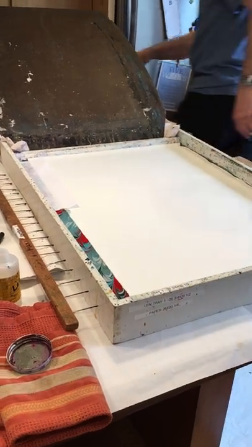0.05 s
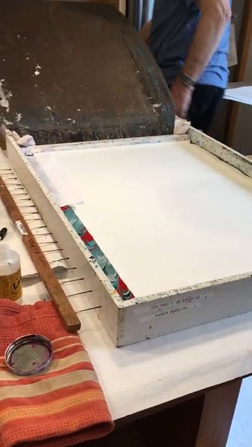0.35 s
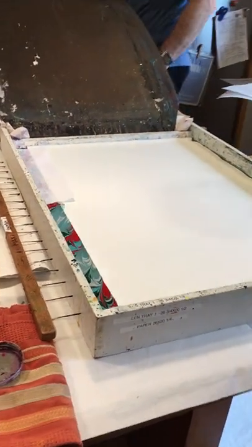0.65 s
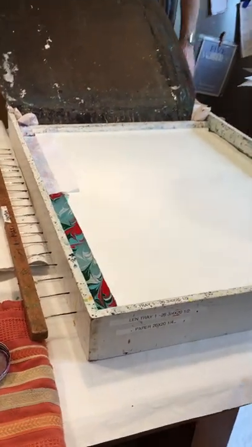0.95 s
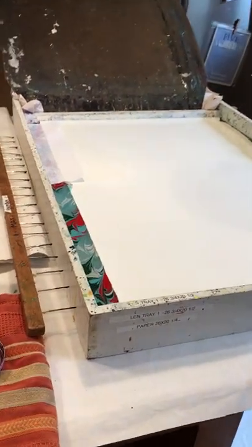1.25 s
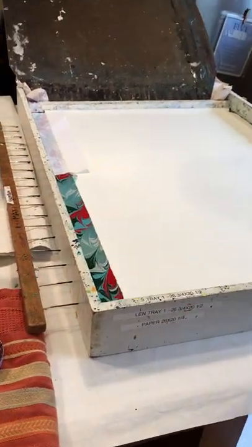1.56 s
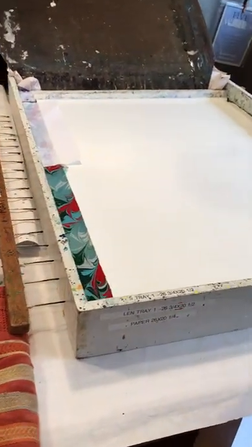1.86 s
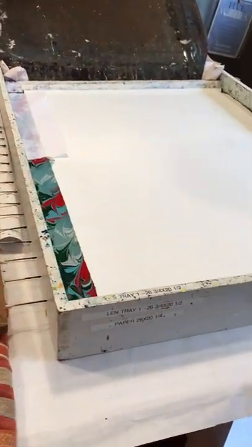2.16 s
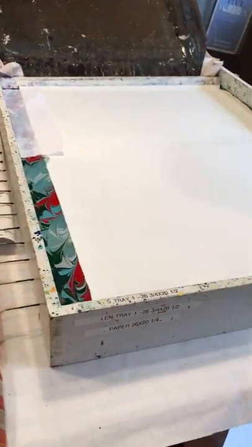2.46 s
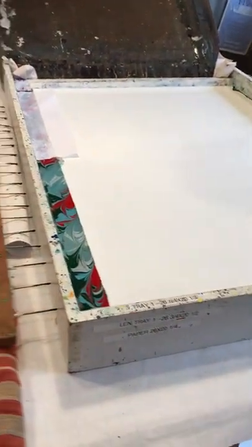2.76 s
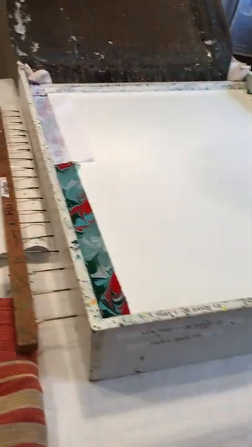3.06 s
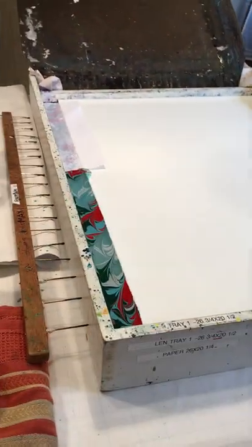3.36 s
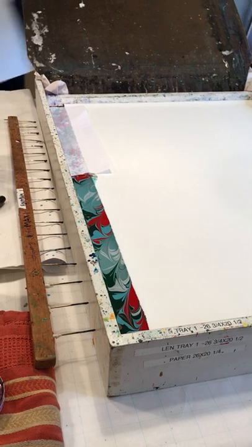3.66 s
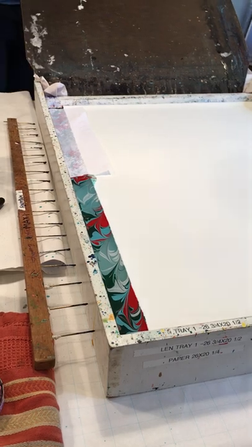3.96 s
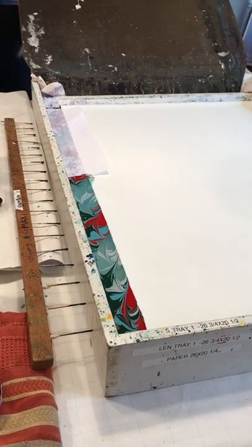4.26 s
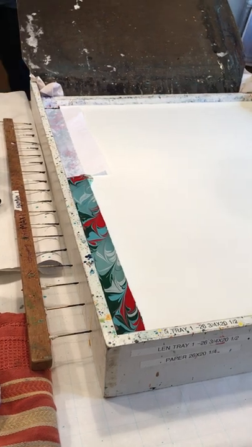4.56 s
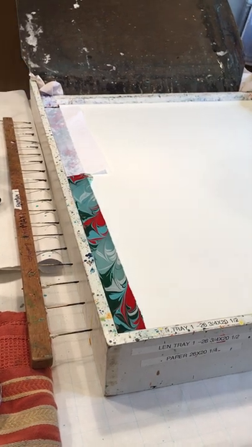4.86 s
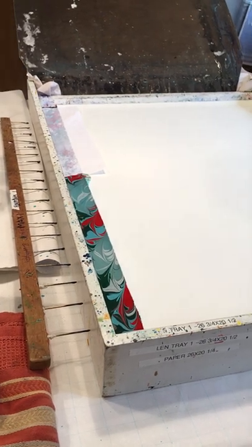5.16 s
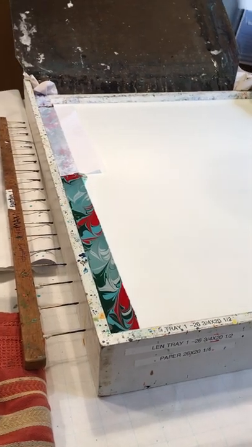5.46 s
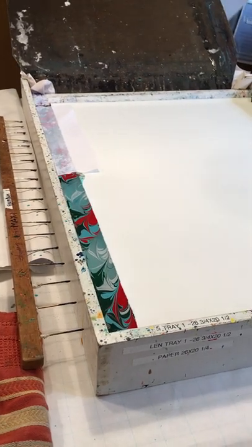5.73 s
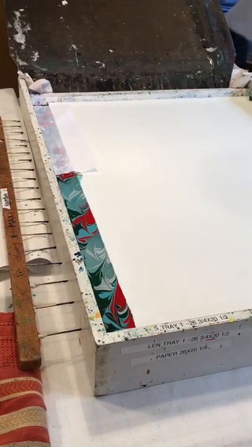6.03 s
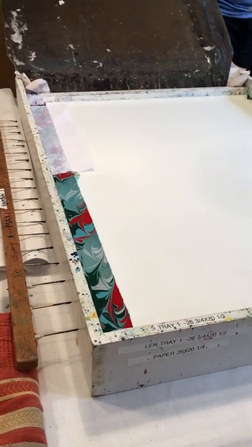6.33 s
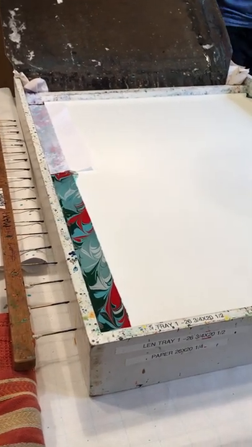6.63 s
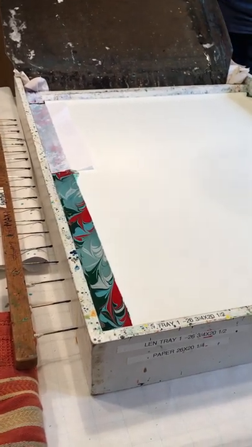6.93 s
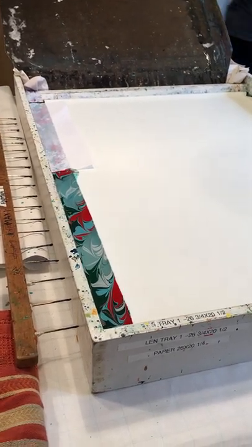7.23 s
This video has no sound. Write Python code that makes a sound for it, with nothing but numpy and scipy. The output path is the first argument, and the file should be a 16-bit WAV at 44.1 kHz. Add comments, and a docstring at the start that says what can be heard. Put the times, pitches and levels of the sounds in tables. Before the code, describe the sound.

Faint, irregular hisses and crinkles of paper being dragged over a workbench, with an occasional thin scrape from an edge. Muffled footfalls and small wooden taps fall in between. Past the middle, a sheet is pulled free and flaps sharply twice, the loudest moment, before the quiet handling resumes. The room sounds small and slightly boxy, with a low appliance hum and a soft microphone bump near each end.

```python
"""Paper slides over a bench with a light knock and a soft footfall: someone is handling large sheets in a
small workroom. Each short stroke hisses as fibres rub and rustles as the sheet flexes; now and then a
dragged edge sings faintly. About five seconds in, a sheet is pulled free and snaps taut in two loud flaps.
Footfalls and knocks come between, with two deep handling bumps, over still air and a quiet hum."""
import sys
import numpy as np
from scipy import signal
from scipy.io import wavfile
from scipy.ndimage import uniform_filter1d

SR = 44100
rng = np.random.default_rng(int(sys.argv[2]) if len(sys.argv) > 2 else 0)


def output_pcm(signal):
    """Save a mono or channel-first signal as 16-bit PCM at the path in sys.argv[1].

    Samples are clipped to [-1, 1] before scaling.
    """
    pcm = np.clip(np.atleast_2d(signal).T, -1, 1) * 32767
    wavfile.write(sys.argv[1], SR, np.round(pcm).astype(np.int16))


N = 330309

# strokes of sliding paper:
# (start [s], speed-up [s], hold [s], hiss level [dB], fizz relative to hiss [dB], flex level [dB])
PAPER_STROKES = [(0.0, 0.056, 0.055, -62, 2.5, -62.5), (0.106, 0.014, 0.069, -57.5, -9.5, -60.5),
                 (0.213, 0.03, 0.12, -70.5, -1.5, -71), (0.68, 0.052, 0.024, -56.5, -11, -62.0),
                 (0.87, 0.27, 0.07, -72, 1, -84), (1.117, 0.024, 0.058, -61.0, -0.5, -67.5),
                 (1.134, 0.11, 0.018, -53, -20, -63.5), (1.38, 0.065, 0.027, -68.5, -3, -81.5),
                 (1.532, 0.078, 0.013, -72, 2.5, -88), (1.68, 0.033, 0.053, -60, -8, -72),
                 (1.77, 0.06, 0.051, -58, -19, -65.5), (2.437, 0.044, 0.055, -72.0, -2.5, -70.5),
                 (2.599, 0.25, 0.019, -57.5, -3.5, -65), (2.906, 0.022, 0.082, -58.5, 1.5, -60.5),
                 (3.14, 0.026, 0.12, -69, -3.0, -68), (3.327, 0.036, 0.1, -78, -7, -68.0),
                 (3.604, 0.018, 0.085, -73.5, -11, -67.5), (3.706, 0.02, 0.083, -62, 2, -57),
                 (3.81, 0.093, 0.084, -56.5, -9.5, -63.5), (3.993, 0.13, 0.099, -57.5, -8.5, -57.5),
                 (4.408, 0.03, 0.032, -68.5, -5, -60), (4.478, 0.15, 0.14, -59, 1, -61),
                 (4.842, 0.1, 0.18, -71, -5, -62.5), (5.139, 0.062, 0.014, -54, 1.5, -62),
                 (5.169, 0.055, 0.058, -46, -7, -34.5), (5.273, 0.044, 0.038, -44.5, -4.5, -39),
                 (5.525, 0.143, 0.032, -65.0, -1.0, -70), (5.68, 0.045, 0.064, -53.5, -2, -55.5),
                 (5.79, 0.026, 0.0097, -52.5, -13, -66), (6.029, 0.035, 0.069, -65.5, -1.5, -64),
                 (6.195, 0.063, 0.14, -69, 0, -71), (6.457, 0.013, 0.037, -61.5, -4.5, -57.5),
                 (6.535, 0.081, 0.021, -61, 0.5, -64.5), (6.68, 0.071, 0.044, -62.5, -3.5, -67),
                 (6.85, 0.201, 0.057, -57.5, 3.5, -70.0), (7.139, 0.043, 0.068, -61.5, -4.5, -66.5),
                 (7.268, 0.053, 0.092, -65.5, -7, -64)]
# tone of a stroke's hiss, fizz and flex: (frequency [Hz], gain [dB])
HISS_SPECTRUM = [(900, -27), (2000, -2), (3100, 1), (4200, 2), (4900, -0.5), (6400, 0.5), (8000, -8.5),
                 (10500, -14.5), (15500, -23.5)]
FIZZ_SPECTRUM = [(3000, -27), (6500, -4), (8000, -2), (9400, 0), (10500, -7), (11800, -2.5), (15500, -10)]
FLEX_SPECTRUM = [(100, -27.5), (250, -11), (480, -4), (720, -0.5), (1100, 2.5), (1600, 0.5), (2400, -4.5),
                 (3500, -8), (6000, -58.5)]
# snaps that make up the two flaps: (time [s], level [dB], 60 dB decay [s], upper edge [Hz])
SHEET_SNAPS = [(5.023, -45, 0.26, 9100), (5.0312, -31.5, 0.069, 6500), (5.0384, -29, 0.027, 2350),
               (5.231, -24.5, 0.098, 2500), (5.252, -28, 0.12, 1400)]
# tone of a snapping sheet: (frequency [Hz], gain [dB])
SNAP_SPECTRUM = [(50, -33), (130, -8), (250, -7), (470, -10.5), (650, -1.5), (820, -1), (1000, 1),
                 (1400, 0.5), (2500, -5), (3800, -5), (5000, -13.5), (9000, -13), (15000, -28)]
# dragged paper edges: (midpoint [s], length [s], pitch [Hz], bandwidth [Hz], level [dB])
EDGE_SCRAPES = [(2.766, .28, 2290, 260, -65), (2.869, .45, 1315, 280, -61.5), (2.984, 0.14, 6250, 450, -58),
                (3.207, 0.083, 2950, 1000, -63.5), (3.445, 0.48, 2320, 300, -73),
                (3.696, .15, 1550, 130, -61.5), (5.655, 0.14, 1300, 120, -62),
                (6.116, .06, 1300, 300, -53.5)]
# knocks, taps and ticks on the bench: (time [s], level [dB], lower edge [Hz], upper edge [Hz])
BENCH_KNOCKS = [(0.0, -47, 500, 2020), (.185, -48, 600, 1430), (.678, -55, 260, 2300),
                (.826, -60.5, 280, 1010), (1.15, -50, 200, 610), (2.028, -48, 226, 2200),
                (2.034, -43.5, 483, 2340), (2.483, -65, 350, 1430), (2.857, -53.5, 3400, 6130),
                (2.976, -53.5, 800, 1360), (3.013, -58.5, 220, 600), (3.712, -61.5, 700, 5000),
                (3.747, -55.5, 400, 2200), (3.792, -50.5, 338, 830), (4.072, -53.5, 910, 4300),
                (4.079, -44.5, 380, 865), (4.123, -45, 650, 1640), (4.247, -54.5, 278, 1190),
                (4.474, -53.5, 343, 920), (4.635, -49.5, 690, 3460), (4.769, -58.5, 390, 1490),
                (5.732, -47, 260, 1200), (6.057, -55, 900, 3800), (6.302, -50, 1800, 6200),
                (6.374, -41.5, 190, 1800), (6.473, -49, 200, 690), (6.626, -60, 300, 913),
                (6.753, -61.5, 830, 1760), (7.17, -59.5, 250, 700)]
# soft footfalls and bumps: (time [s], level [dB], pitch [Hz])
FOOTFALLS = [(0.061, -42, 182), (.105, -47, 176), (0.681, -49.5, 189), (.823, -52.5, 258),
             (1.148, -43, 185), (1.659, -58, 250), (2.029, -50, 138), (2.481, -56.5, 147),
             (2.993, -47.5, 155), (3.011, -54, 229), (3.532, -54.5, 203), (3.626, -53.5, 200),
             (3.749, -50, 158), (3.901, -49.5, 175), (4.121, -51.5, 132), (4.245, -54.5, 229),
             (4.63, -41, 120), (4.648, -46, 119), (5.032, -48, 204), (5.735, -39, 168.4),
             (6.374, -39.5, 195), (7.167, -45.5, 194)]
# bumps of the hand holding the microphone: (time [s], level [dB], length [s])
HAND_BUMPS = [(0.209, -44.5, 0.075), (7.352, -46.5, 0.13)]
# resonances of the bench corner: (frequency [Hz], bandwidth [Hz], gain [dB])
CORNER_RESONANCES = [(403.5, 30, 4), (604, 220, 5.5), (715, 6.8, -1), (837, 11, 4.5), (969, 68, 4),
                     (1061, 37, 4), (1333, 62, 1)]
# reverb time of the workroom: (frequency [Hz], 60 dB decay [s])
ROOM_DECAY = [(100, 0.89), (300, 0.55), (1000, 0.38), (3000, 0.44), (8000, 0.38), (15000, 0.34)]
# tone of the still air: (frequency [Hz], gain [dB])
AIR_SPECTRUM = [(20, -46.5), (45, -3), (65, -2.5), (90, -15.5), (140, -2.5), (200, -8), (300, -10.5),
                (460, -19), (700, -23), (900, -22.5), (2000, -28), (4750, -35), (7000, -34), (15500, -41.5)]
# partials of an appliance's hum: (frequency [Hz], level [dB])
HUM_PARTIALS = [(59.3, -68.5), (120, -74.5), (167, -72.5)]


def sliding_paper(grip_s=0.011, start_speed=0.23):
    """Each stroke speeds up, holds and rests, rubbing fibres (hiss, fizz) and bending the sheet (flex)."""
    fades_db_per_s = (139.5, 189, 108)  # hiss, fizz, flex: the finest texture dies first
    power = np.zeros((3, N))
    t = np.arange(SR) / SR
    for start, rise_s, hold_s, hiss_db, fizz_db, flex_db in PAPER_STROKES:
        ease_in = np.sin(np.pi / 2 * np.minimum(t / rise_s, 1)) ** 2
        speed = start_speed + (1 - start_speed) * ease_in  # share of top speed
        rub = np.minimum(t / grip_s, 1) * speed
        slowing_s = np.maximum(t - rise_s - hold_s, 0)
        for layer, db, fade in zip(power, (hiss_db, hiss_db + fizz_db, flex_db), fades_db_per_s):
            add(layer, start, (rub * amp(db - fade * slowing_s)) ** 2)
    hiss_envelope, fizz_envelope, flex_envelope = np.sqrt(power)
    fine = room(grains(N, per_s=12000, spread_db=0.5), wet_db=-8, early_db=-15)
    finest = room(grains(N, per_s=15000, spread_db=0.5), wet_db=-31, early_db=-3)
    coarse = room(grains(N, per_s=7000, spread_db=2.5), wet_db=-6.5, early_db=-9)
    hiss = unit(colour(fine, lambda hz: amp(curve(HISS_SPECTRUM, hz))))
    fizz = unit(colour(finest, lambda hz: amp(curve(FIZZ_SPECTRUM, hz))))
    flex = unit(colour(coarse, lambda hz: amp(curve(FLEX_SPECTRUM, hz)) * corner_gain(hz)))
    return hiss_envelope * hiss + fizz_envelope * fizz + flex_envelope * flex


def sheet_flaps():
    """The sheet snaps taut, buckling in a quick run of pops that fill the room."""
    out = np.zeros(N)
    for start, db, t60, top_hz in SHEET_SNAPS:
        tone = lambda hz: amp(curve(SNAP_SPECTRUM, hz)) * corner_gain(hz) / np.hypot(1, (hz / top_hz) ** 2)
        pops = colour(burst(t60, per_s=7900, spread_db=0.5), tone)
        add(out, start, at_level(room(pops, wet_db=0, early_db=1), db))
    return out


def edge_scrapes():
    """Friction feeds one resonance of a dragged paper edge, swelling and fading."""
    out = np.zeros(N)
    for middle, length, pitch_hz, width_hz, db in EDGE_SCRAPES:
        swell = signal.windows.cosine(int(length * SR))
        friction = grains(SR, per_s=12000, spread_db=-1)
        song = colour(friction, lambda hz: bell(hz, pitch_hz, width_hz))
        add(out, middle - length / 2, at_level(song[:len(swell)] * swell, db))
    return out


def bench_knocks():
    """Damped knocks: the object's size sets the lower band edge, the contact's hardness the upper."""
    out = np.zeros(N)
    for start, db, low_hz, high_hz in BENCH_KNOCKS:
        t60 = 0.16 * (1000 / high_hz) ** 0.21  # harder knocks die sooner
        rolloff = lambda hz: np.sqrt((1 + (low_hz / (hz + 1)) ** 2.8) * (1 + (hz / high_hz) ** 8))
        knock = colour(burst(t60, per_s=9000, spread_db=1), lambda hz: corner_gain(hz) / rolloff(hz))
        add(out, start, at_level(room(knock, wet_db=-3.5, early_db=-4), db))
    return out


def footfalls(ring_t60_s=0.11, attack_s=0.0023):
    """A soft blow rings the floor or bench briefly, with a longer, dull rattle around that pitch."""
    out = np.zeros(N)
    t = np.arange(SR // 2) / SR
    for start, db, pitch_hz in FOOTFALLS:
        envelope = amp(-60 * t / ring_t60_s) * (1 - np.exp(-t / attack_s))
        ring = np.sin(2 * np.pi * pitch_hz * t) * envelope
        band = lambda hz: 1 / np.sqrt((1 + (80 / (hz + 1)) ** 6) * (1 + (hz / (1.6 * pitch_hz)) ** 7))
        rattle = colour(burst(ring_t60_s * 2.22, per_s=3300, spread_db=5.5), band)
        thud = unit(ring) + amp(-1) * unit(rattle)
        add(out, start, at_level(room(thud, wet_db=-8.5, early_db=-6.5), db))
    return out


def hand_bumps(centre_hz=42, half_width_hz=22):
    """The hand holding the microphone shifts: a short, dry sub-bass shudder."""
    out = np.zeros(N)
    t = np.arange(SR // 2) / SR
    band = lambda hz: 1 / (1 + ((hz - centre_hz) / half_width_hz) ** 4)
    for start, db, length in HAND_BUMPS:
        shudder = colour(rng.standard_normal(len(t)), band)
        rise = t / (length / 4)
        swell = rise ** 2 * np.exp(-2 * rise)  # peaks a quarter of the way in
        add(out, start, at_level(shudder * swell, db))
    return out


def room_tone(air_db=-63.5):
    """The bed under it all: still air and the steady hum of an appliance."""
    air = unit(colour(rng.standard_normal(N), lambda hz: amp(curve(AIR_SPECTRUM, hz))))
    t = np.arange(N) / SR
    hum = sum(amp(db) * np.sin(2 * np.pi * (hz * t + rng.random())) for hz, db in HUM_PARTIALS)
    return amp(air_db) * air + np.sqrt(2) * hum


def room(x, wet_db, early_db, reflections=40, build_up_s=0.014):
    """Direct sound, early reflections off near surfaces, and a tail that dies fastest in the treble."""
    t = np.arange(SR // 2) / SR
    hz, frame_s, spectrum = signal.stft(rng.standard_normal(len(t)), SR, nperseg=256)
    decay = amp(-60 * frame_s / curve(ROOM_DECAY, hz)[:, None])
    tail = signal.istft(spectrum * decay, SR, nperseg=256)[1][:len(t)]
    tail *= 1 - np.exp(-t / build_up_s)
    response = amp(wet_db) * tail / np.linalg.norm(tail)
    delays_s = rng.uniform(0.002, 0.02, size=reflections)
    polarity = rng.choice([-1, 1], size=reflections)
    response[(delays_s * SR).astype(int)] += amp(early_db) * polarity / np.sqrt(reflections)
    response[0] += 1  # direct sound
    return signal.fftconvolve(x, response)[:len(x)]


def corner_gain(hz):
    """The boxy colour of narrow resonances around the bench."""
    return amp(sum(db * bell(hz, centre, width) for centre, width, db in CORNER_RESONANCES))


def grains(size, per_s, spread_db):
    """Tiny slips and contacts: random clicks, made more uneven in level by spread_db."""
    height = amp(spread_db * np.minimum(rng.exponential(1, size), 4))
    return unit(rng.standard_normal(size) * height * (rng.random(size) < per_s / SR))


def burst(t60, per_s, spread_db):
    """A cluster of contacts that starts at once and dies away."""
    t = np.arange(SR // 2) / SR
    return grains(len(t), per_s, spread_db) * amp(-60 * t / t60)


def colour(x, gain):
    """Minimum-phase EQ with the magnitude gain(hz), so attacks have no pre-ring."""
    hz = abs(np.fft.fftfreq(len(x), 1 / SR))
    log_gain = np.log(np.maximum(gain(hz), 1e-5))
    response = np.exp(np.conj(signal.hilbert(log_gain)))
    return np.fft.ifft(np.fft.fft(x) * response).real


def bell(hz, centre_hz, width_hz):
    """A resonance peak of height 1."""
    return 1 / (1 + (2 * (hz - centre_hz) / width_hz) ** 2)


def curve(points, hz):
    """Interpolates a table on a log-frequency axis."""
    point_hz, value = np.transpose(points)
    return np.interp(np.log(hz + 1), np.log(point_hz), value)


def amp(db):
    """Decibels to gain."""
    return 10 ** (np.asarray(db) / 20)


def unit(x):
    """Scales to rms 1."""
    return x / np.sqrt(np.mean(x ** 2) + 1e-20)


def at_level(x, db):
    """Sets the rms level of the loudest 10 ms."""
    return amp(db) * x / np.sqrt(uniform_filter1d(x ** 2, SR // 100).max())


def add(mix, start_s, sound):
    """Lays a sound into the mix."""
    part = mix[max(round(start_s * SR), 0):][:len(sound)]
    part += sound[:len(part)]


def scene():
    """Paper, impacts and room tone in one mono mix, fed to both channels."""
    paper = sliding_paper() + edge_scrapes() + sheet_flaps()
    mono = paper + bench_knocks() + footfalls() + hand_bumps() + room_tone()
    return np.array([mono, mono])


def record(dry, low_cut_hz=30, high_cut_hz=15750):
    """A gentle low cut and a steep high cut on the whole mix."""
    thinned = signal.sosfilt(signal.butter(2, low_cut_hz, "highpass", fs=SR, output="sos"), dry)
    high_cut = signal.firwin(801, high_cut_hz, window=("kaiser", 9), fs=SR)
    return signal.oaconvolve(thinned, high_cut[None], "same", axes=1)


dry = scene()
out = record(dry)
output_pcm(out)
```